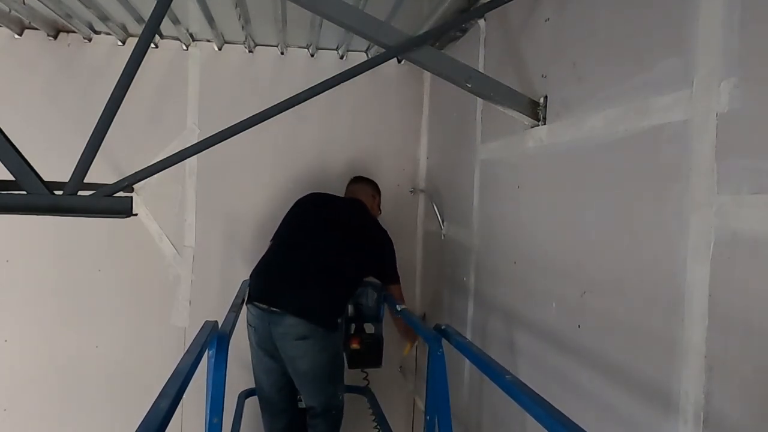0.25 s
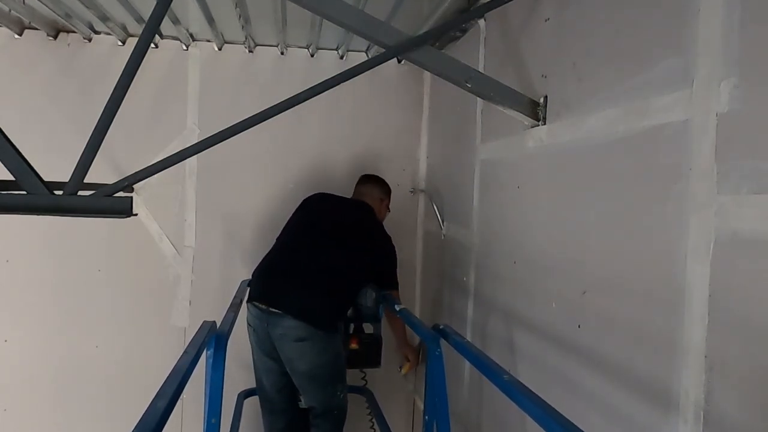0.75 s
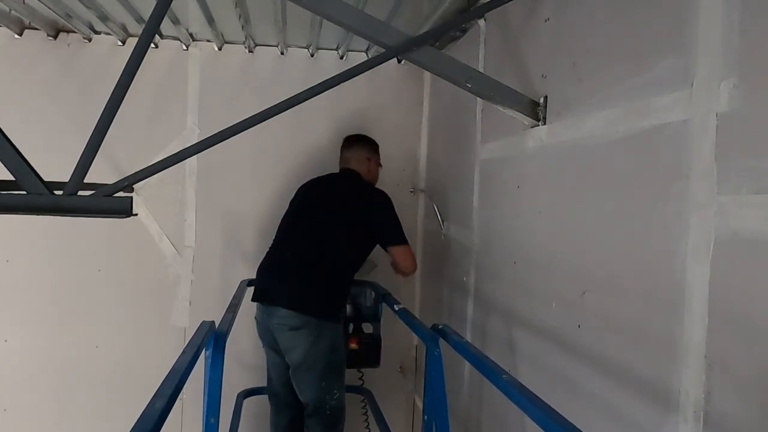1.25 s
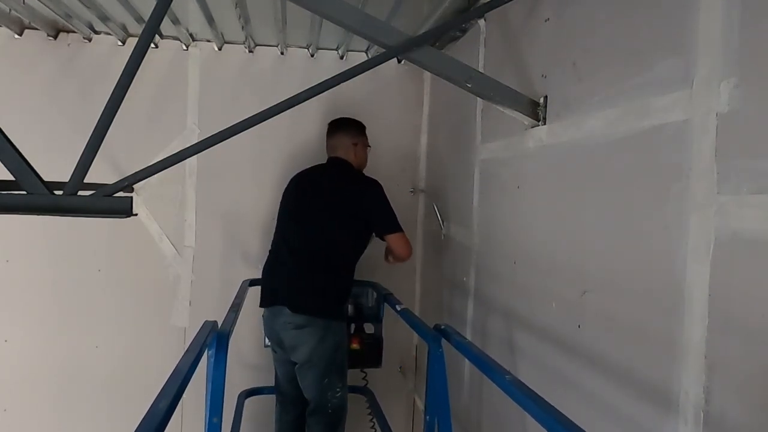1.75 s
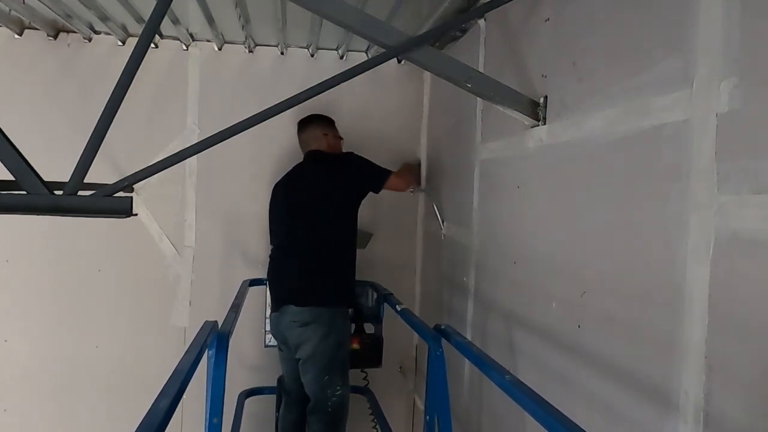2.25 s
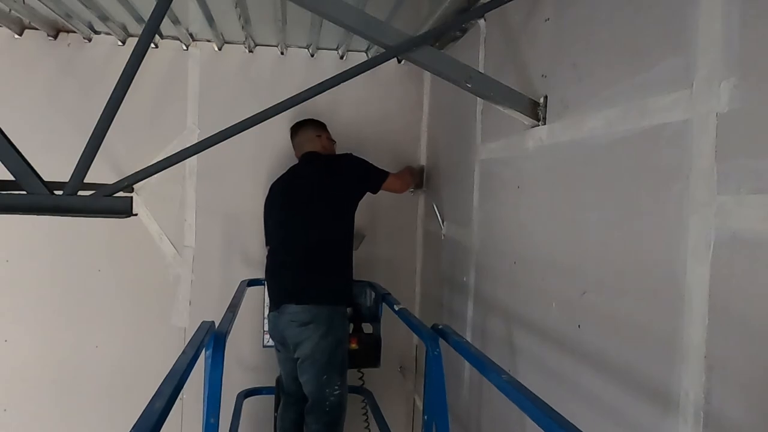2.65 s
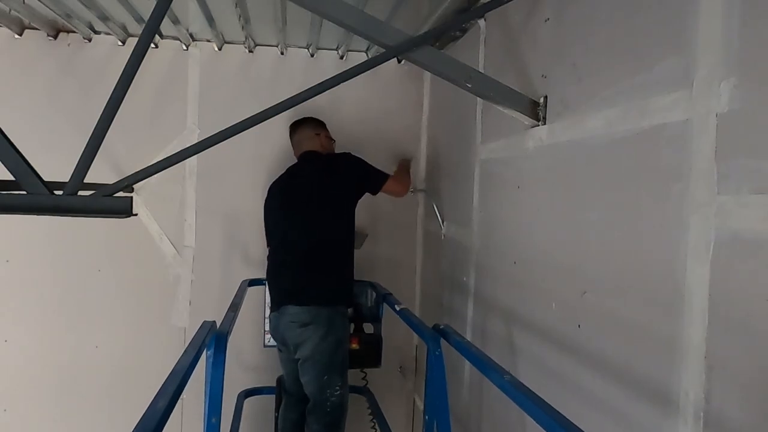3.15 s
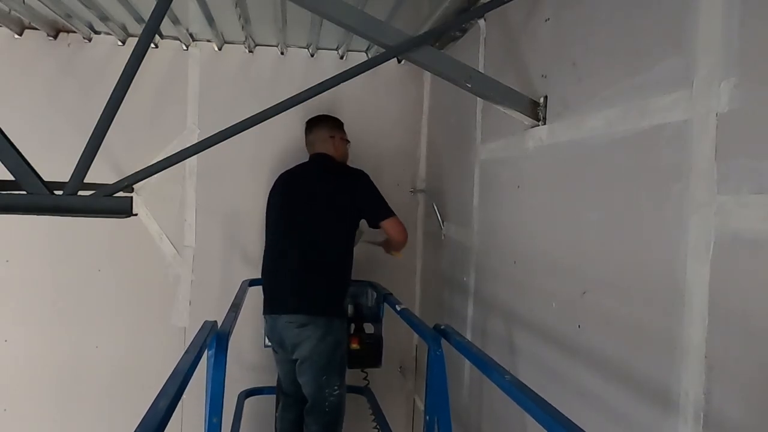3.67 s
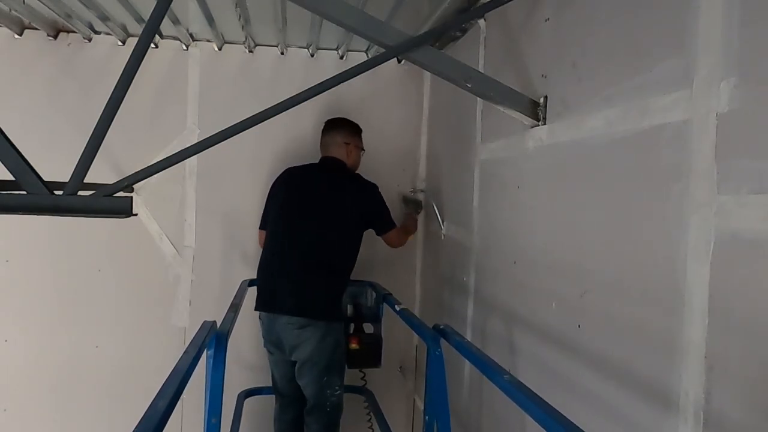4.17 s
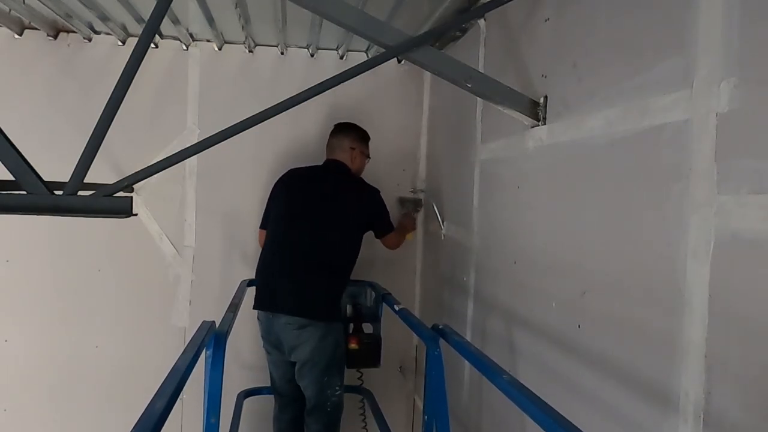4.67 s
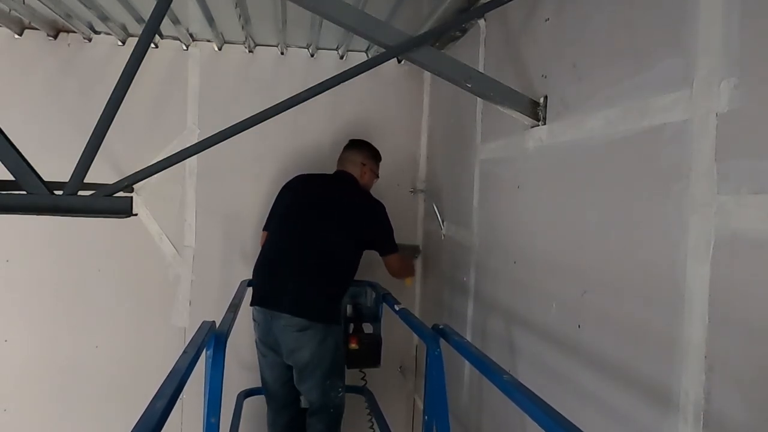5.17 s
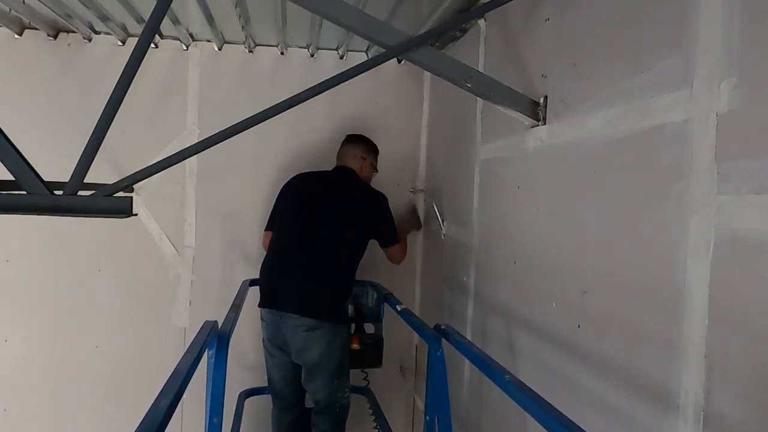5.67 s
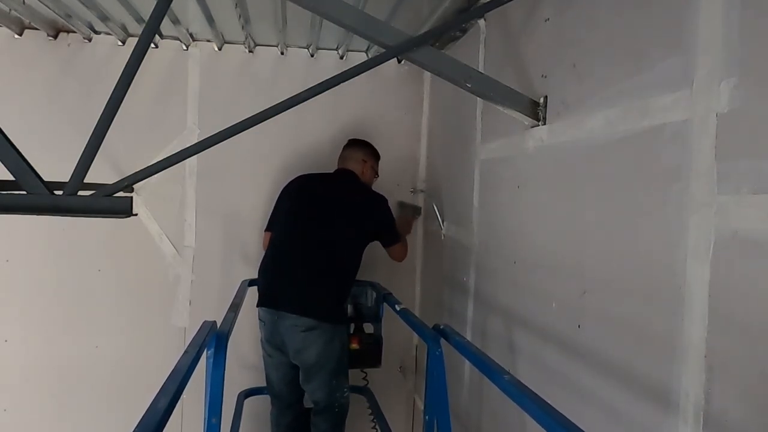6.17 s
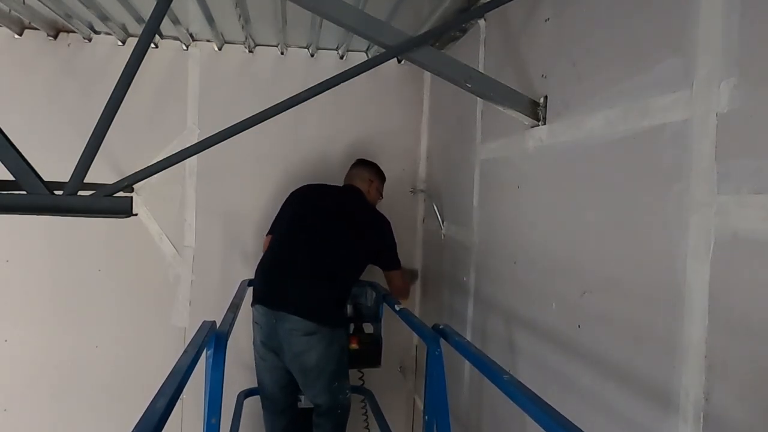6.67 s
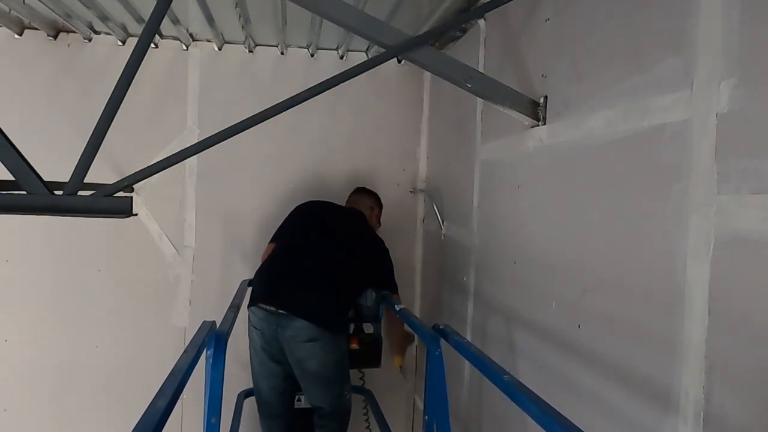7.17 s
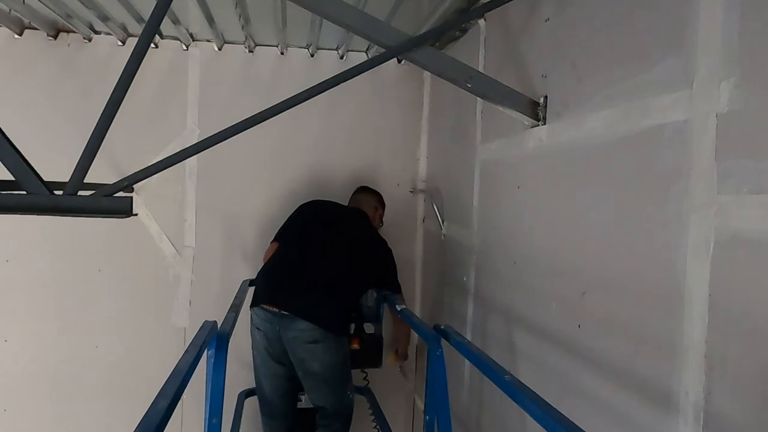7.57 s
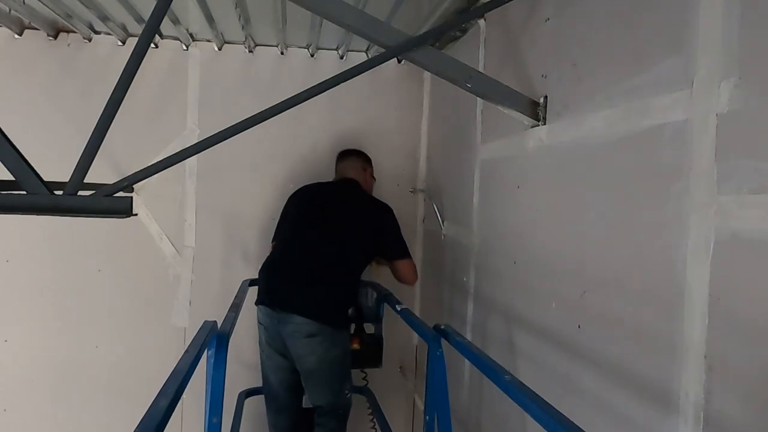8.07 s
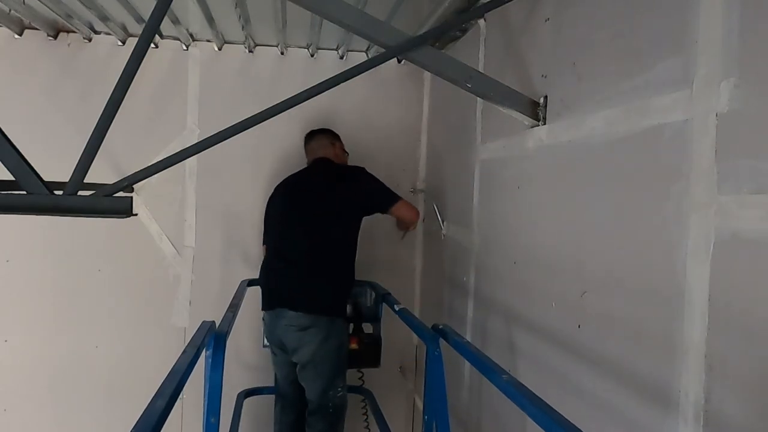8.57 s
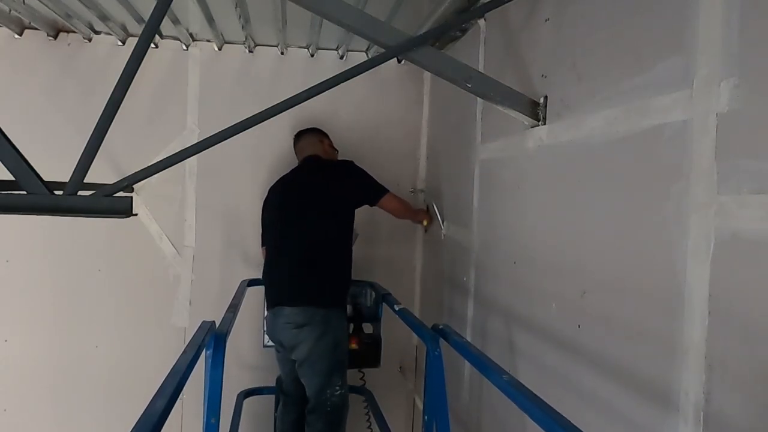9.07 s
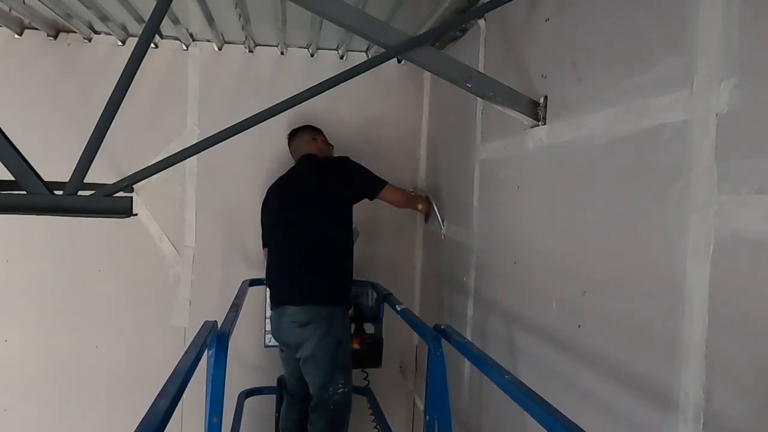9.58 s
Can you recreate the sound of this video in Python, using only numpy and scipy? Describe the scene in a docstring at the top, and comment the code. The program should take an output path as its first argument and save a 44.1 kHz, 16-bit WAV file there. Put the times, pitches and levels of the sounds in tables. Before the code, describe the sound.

A taping knife scrapes compound along drywall and clacks against a mud pan three times, in an echoing hall with traffic humming outside.

```python
"""A taping knife scrapes joint compound down a drywall corner in a tall steel-roofed hall, while
traffic hums outside. Grit under the edge hisses, rings the blade and drives the board; knocks thud
and tick on the wall. The first of four faint, high chirps hangs in the hall. Then the blade clacks on
the mud pan and is drawn clean over its rim, rubbing out a hollow note. Twice more the knife works the
wall and returns to the pan, and it ends with a few short scrapes."""
import sys
import numpy as np
from scipy import signal
from scipy.fft import rfft, irfft, next_fast_len
from scipy.io import wavfile
from scipy.ndimage import uniform_filter1d

SR = 44100
rng = np.random.default_rng(int(sys.argv[2]) if len(sys.argv) > 2 else 0)


def int16_out(signal):
    """Quantize to a 16-bit WAV file."""
    q = np.round(np.clip(np.atleast_2d(signal).T, -1, 1) * 32767)
    wavfile.write(sys.argv[1], SR, q.astype(np.int16))


N = 433498
TIME = np.arange(N) / SR


def amp(db):
    """Decibels to gain."""
    return 10 ** (np.asarray(db) / 20)


def unit_rms(x):
    """Scales to rms 1."""
    return x / np.sqrt(np.mean(x ** 2) + 1e-20)


def at_hz(points, hz):
    """Reads a table on a log-frequency axis."""
    points_hz, values = np.transpose(points)
    return np.interp(np.log(hz + 1), np.log(points_hz + 1), values)


def automation(rows, column=1):
    """One column of a table, joined by straight lines over time."""
    rows = np.array(rows)
    return np.interp(TIME, rows[:, 0], rows[:, column])


def add(mix, start_s, sound):
    """Lays a sound into the mix."""
    part = mix[max(round(start_s * SR), 0):][:len(sound)]
    part += sound[:len(part)]


def colour(x, spectrum):
    """Minimum-phase EQ of unit energy: the spectrum sets only the tone."""
    log_gain = np.log(amp(at_hz(spectrum, abs(np.fft.fftfreq(4096, 1 / SR)))))
    response = np.exp(np.conj(signal.hilbert(log_gain)))
    taps = np.fft.ifft(response).real[:2048]
    return signal.oaconvolve(x, taps / np.linalg.norm(taps))[:N]


def wander(per_s):
    """Random drift of rms 1."""
    knots = rng.standard_normal(4000)
    return unit_rms(np.interp(TIME * per_s, np.arange(len(knots)), knots))


def resonate(x, hz, *widths_hz):
    """Resonances in series, one per width, that follow the curve hz; rms 1."""
    carrier = np.exp(2j * np.pi * np.cumsum(hz) / SR)
    for width_hz in widths_hz:
        pole = np.exp(-np.pi * width_hz / SR)
        x = unit_rms((carrier * signal.lfilter([1 - pole], [1, -pole], x / carrier)).real)
    return x


def grit(per_s, spread_db, smear):
    """Friction: tiny slips of uneven size over a smooth smear."""
    slips = (rng.random(N) < per_s / SR) * rng.standard_normal(N)
    slips *= amp(spread_db * np.minimum(rng.exponential(1, N), 4))
    return unit_rms(unit_rms(slips) + smear * rng.standard_normal(N))


def pull(start_s, length_s, rise_s, release_s, change_db):
    """Envelope of one pull: the blade lands, its pressure drifts by change_db, and it lifts."""
    t, gain = np.arange(0, length_s, 1 / SR), np.zeros(N)
    lands = np.minimum(t / rise_s, 1) ** 0.9
    lifts = np.minimum((length_s - t) / release_s, 1) ** 1.5
    drift = amp(np.interp(t, [rise_s, length_s], [0, change_db]))
    add(gain, start_s, lands * lifts * drift)
    return gain


# Pulls along the wall; the sends feed the blade's ring and the board's drone:
# start_s, length_s, rise_s, release_s, level_db, change_db, ring_send_db, drone_send_db, board_pitch_hz
STROKES = [(0.0, 0.45, 0.0017, 0.078, -38.5, -3.5, 3.5, -9.5, 677),
           (0.44, 0.3, 0.022, 0.035, -42, -9, 0, -18, 820),
           (0.698, 0.081, 0.031, 0.015, -38.5, 2, -0.5, -2.5, 506),
           (0.795, 0.24, 0.037, 0.025, -41, -11, 3.5, -6, 490),
           (2.842, 0.43, 0.21, 0.07, -47.5, -3.5, 3.5, -13, 900),
           (4.757, 0.33, 0.17, 0.014, -39, -10, 12, 7, 830),
           (5.067, 0.32, 0.019, 0.14, -40, -6.5, 8, 5, 593),
           (6.229, 0.2, 0.11, 0.016, -36, -2.5, 9.5, 8, 764),
           (6.425, 0.21, 0.02, 0.0079, -40, 0.5, 6.5, 2, 763),
           (6.641, 0.515, 0.017, 0.038, -37.5, -3, 8, 5, 677),
           (7.109, 0.48, 0.048, 0.18, -37, -11, 6.5, 3.5, 593),
           (7.566, 0.21, 0.03, 0.044, -52, 1, 4.5, -4, 827),
           (9.072, 0.23, 0.19, 0.081, -43.5, -3.5, 0, -12, 780),
           (9.523, 0.11, 0.039, 0.02, -54, -9, 4, 0, 760),
           (9.625, 0.078, 0.046, 0.04, -35.5, 4, 7.5, -1, 840)]
# The hand's path and the blade's two notes: time_s, height_m, bend_hz, squeak_hz, squeal_amount
HAND = [(0, 1.04, 1310, 3830, 0.17), (.2, 0.81, 1133, 3650, 0.42), (.3, 1.05, 1500, 3930, 0.59),
        (.4, 1.07, 1093, 3440, 0.66), (.6, 0.63, 1157, 3930, 0.5), (.9, 0.46, 1006, 3440, 0.28),
        (3, 0.89, 1160, 3560, 0.52), (3.3, 2.7, 1110, 3550, 0.15), (4.9, 1.97, 1464, 3470, 0.36),
        (5.2, 1.01, 1470, 3870, 0.28), (6.3, 1.4, 1376, 3450, 0.17), (6.9, 0.86, 1205, 3920, .3),
        (7.25, 0.48, 1070, 3415, 0.068), (9.2, 1.6, 1310, 3500, 0.13), (9.8, 1.65, 1370, 3515, 0.16)]
# Tone of the hissing edge, the steel blade and the hollow board: frequency_hz, gain_db
EDGE_EQ = [(1500, -21), (2200, -5.5), (2750, -3.5), (3400, 0.5), (4200, -3), (5200, -6.5), (7000, -12.5),
           (8500, -16.5), (10800, -27), (12400, -27.5), (15500, -48)]
BLADE_EQ = [(600, -20.5), (850, -1.5), (1100, 6.5), (1500, 7), (2000, 3.5), (2400, -8.5), (3200, -38.5),
            (15500, -73.5)]
BOARD_EQ = [(100, -6.5), (220, -17), (350, -36), (470, -3.5), (600, -3), (730, 10), (900, 7), (1300, -31.5),
            (15500, -74.5)]


def scrapes():
    """Grit under the edge hisses, rings the blade and drives the board; the side wall echoes it."""
    hiss, ring, drone, board_hz = np.zeros((4, N))
    drag = amp(-0.5 * wander(per_s=16))  # the blade drags unevenly through the compound
    for start_s, length_s, rise_s, release_s, level_db, change_db, ring_db, drone_db, hz in STROKES:
        pressure = amp(level_db) * drag * pull(start_s, length_s, rise_s, release_s, change_db)
        hiss += pressure
        ring += amp(ring_db) * pressure
        drone += amp(drone_db) * pressure
        board_hz[TIME >= start_s] = hz
    ring, drone = uniform_filter1d([ring, drone], size=1500)  # both follow the pressure lazily
    slips = grit(per_s=1800, spread_db=2.2, smear=1.1) * amp(.9 * wander(per_s=70))
    # The blade's notes shift as it is pressed and tilted, and stand out when the edge runs dry.
    bend_hz = automation(HAND, column=2) * (1 + .03 * wander(per_s=14))
    squeak_hz = automation(HAND, column=3) * (1 + .015 * wander(per_s=20))
    squeal = automation(HAND, column=4)

    def voice(eq, note_gain, hz, widths_hz):
        """Equal-power blend of plain scrape and a singing note."""
        note = resonate(slips, hz, *widths_hz)
        return (colour(slips, eq) + note_gain * note) / np.hypot(1, note_gain)

    edge = voice(EDGE_EQ, squeal, squeak_hz, widths_hz=(220, 600))
    blade = voice(BLADE_EQ, 1.5 * squeal, bend_hz, widths_hz=(150, 400))
    board = voice(BOARD_EQ, 0.48, board_hz, widths_hz=(86, 172))
    scrape = amp(-0.5) * hiss * edge + amp(-4.5) * ring * blade + amp(-5) * drone * board
    echo_delay_s = np.hypot(automation(HAND), .4) / 343  # moves with the hand's height
    return 0.78 * (scrape + 0.22 * np.interp(TIME - echo_delay_s, TIME, scrape))


# An engine gathering speed, and a deeper one: time_s, pitch_hz, level_db
RISING_ENGINE = [(0, 92, -59), (.3, 92.5, -40), (.8, 93.5, -36), (1.2, 96.6, -47.5), (1.6, 103, -56),
                 (1.87, 106, -46), (2.03, 108, -50.5), (2.24, 109.6, -40.5), (2.52, 112, -64),
                 (3.28, 116, -46.5), (3.9, 117, -57.5), (4.44, 118.5, -45.5), (4.95, 121.5, -59.5),
                 (5.25, 123.6, -40), (5.5, 125, -57.5), (7.4, 129.8, -54), (9.83, 134, -53.5)]
DEEP_ENGINE = [(0, 66.7, -72), (.6, 66.9, -47), (1.5, 67.5, -72), (2.7, 68, -62.5), (3.3, 68.6, -50),
               (3.8, 69, -57), (4.7, 70.03, -49.5), (5.25, 71, -46), (5.9, 62.3, -47.5), (6.85, 65.2, -53),
               (7.28, 71.24, -35.5), (7.8, 76.1, -48.5), (8.2, 74, -34.5), (8.62, 68, -50.5),
               (9.2, 69.25, -40), (9.83, 71.97, -39.5)]
# Fader moves of the road noise: time_s, tyres_db, rumble_db
ROAD_LEVELS = [(0, -46.5, -46), (.7, -53.5, -47), (1.4, -57, -48.5), (2.8, -58.5, -48), (4.3, -57.5, -49),
               (5.8, -55, -49.5), (6.4, -51, -49), (7, -57, -47), (8, -50.5, -46), (8.7, -50, -48.5),
               (9.2, -45.5, -45.5), (9.83, -47, -45.5)]
# Tone of the tyres and the rumble: frequency_hz, gain_db
TYRE_EQ = [(250, -9), (450, -15.5), (700, -10.5), (1000, 0.5), (1350, 1.5), (1850, -5), (2400, -17),
           (3500, -22.5), (5500, -30), (8000, -35.5), (10000, -54), (15000, -73)]
RUMBLE_EQ = [(15, -31), (28, -11.5), (45, -1.5), (70, 1), (110, -2), (170, -6.5), (240, -10.5),
             (350, -19.5), (600, -27), (1500, -57), (4000, -73)]


def traffic():
    """Two engine notes, the roar of tyres and a rumble come through the walls."""
    hum = np.zeros(N)
    for engine, roughness, width_hz in [(RISING_ENGINE, .4, 12), (DEEP_ENGINE, .6, 9)]:
        pitch_hz, level_db = automation(engine), automation(engine, column=2)
        throb = resonate(rng.standard_normal(N), pitch_hz, width_hz, 3 * width_hz)
        phase = 2 * np.pi * np.cumsum(pitch_hz) / SR
        tone = np.sqrt(2) * np.sin(phase) + amp(-26.5) * np.sin(2 * phase)
        hum += amp(level_db) * unit_rms(tone + roughness * throb)
    tyres = amp(automation(ROAD_LEVELS) + .5 * wander(per_s=37))
    rumble = amp(automation(ROAD_LEVELS, column=2))
    road = [tyres * colour(tyre_noise, TYRE_EQ) + rumble * colour(low_noise, RUMBLE_EQ)
            for tyre_noise, low_noise in rng.standard_normal((2, 2, N))]
    return hum + diffuse(np.array(road))


def contact(decay_s, rise_s):
    """A blow of a springy blade: a burst of chatter that dies at once."""
    t = np.arange(SR // 8) / SR
    return rng.choice([-1., 1.], len(t)) * (1 - np.exp(-t / rise_s)) * np.exp(-t / decay_s)


def ringing(blows, modes):
    """Blows ring a bank of decaying modes of unit energy."""
    t = np.arange(SR // 2) / SR
    ring = sum(amp(db - 60 * t / t60_s) * np.sin(2 * np.pi * hz * t) for hz, db, t60_s in modes)
    return signal.oaconvolve(blows, ring / np.linalg.norm(ring))[:N]


# Blade hits on the wall: start_s, level_db, thud_send_db, tick_send_db, pitch_hz
KNOCKS = [(0.263, -39.5, -15, 6, 1570), (.724, -42.5, -10, 5.5, 1030), (.935, -43, 2.5, -10, 456),
          (1.068, -42.5, -6, -11, 504), (1.401, -62.5, -5, 3, 1190), (2.514, -65.5, -12, 7, 1200),
          (2.599, -48, -9, -9, 1340), (2.749, -68.5, -2, 5.5, 1200), (3.016, -44.5, 1.5, -10, 802),
          (3.423, -52, -12, -22, 1330), (4.282, -56.5, -5, -5, 1214), (4.627, -62.5, -18.5, 2, 1200),
          (4.951, -23, -20, -20, 883), (5.09, -22.5, -3, -20, 760), (5.768, -70, -13, 1, 1190),
          (6.158, -24, -9.5, -15.5, 1733), (6.184, -38.5, 13, -12, 1720), (6.207, -54, 18, -3, 330),
          (6.421, -22, -27, -15, 735), (7.597, -38.5, -9, -9, 1048), (7.619, -26, -21, -14.5, 1020),
          (7.715, -52, 11.5, -4, 1000), (8.982, -59.5, -14, 1, 1184), (9.113, -41, -15, -10, 1310),
          (9.497, -54, -2, 1, 1200)]
# The knife's own ring: pitch_hz, level_db, t60_s
KNIFE_MODES = [(860, -5.5, 0.14), (1070, -7.5, 0.053), (1426, 5.5, 0.047), (1380, 3.5, 0.022),
               (1940, -10, 0.034), (2890, -9, 0.041)]
# Tone of the board's thud: frequency_hz, gain_db
THUD_EQ = [(30, -11), (60, 2.5), (120, -4), (200, 4.5), (330, -5), (430, -6), (560, -10), (750, -17.5),
           (1200, -45), (15500, -84.5)]


def knocks():
    """The blade lands and rings, with a note set by the spot; the board thuds and the edge ticks."""
    blows, note, thud, tick = np.zeros((4, N))
    for start_s, level_db, thud_db, tick_db, pitch_hz in KNOCKS:
        blow = amp(level_db + 6) * contact(decay_s=.006, rise_s=.001)
        add(blows, start_s, blow)
        add(note, start_s, ringing(blow, [(pitch_hz, 0, 0.06)]))
        add(thud, start_s, amp(level_db + thud_db + 4) * contact(decay_s=.011, rise_s=.001))
        add(tick, start_s, amp(level_db + tick_db + 0.5) * contact(decay_s=.026, rise_s=.0014))
    steel = amp(-3.5) * colour(blows, BLADE_EQ) + amp(-7.5) * ringing(blows, KNIFE_MODES)
    return steel + amp(-5.5) * note + colour(thud, THUD_EQ) + colour(tick, EDGE_EQ)


# Faint high chirps: start_s, level_db, start_pitch_hz
CHIRPS = [(1.237, -66.5, 4440), (2.189, -61, 4190), (4.03, -62.5, 4200), (7.82, -63.5, 4510)]


def chirps():
    """Hoarse, far-off chirps: a falling tone roughened by noise."""
    track, progress = np.zeros(N), np.linspace(0, 1, SR // 5)
    lowpass = signal.butter(4, 600, fs=SR, output="sos")
    envelope = np.sin(np.pi * np.sqrt(progress))
    for start_s, level_db, start_hz in CHIRPS:
        pitch_hz = start_hz * (1 - .2 * progress)
        tone = np.sin(2 * np.pi * np.cumsum(pitch_hz) / SR)
        rasp = unit_rms(signal.sosfilt(lowpass, rng.standard_normal(len(progress))))
        add(track, start_s, amp(level_db + 3.5) * envelope * rasp * tone)
    return track


# Blade hits on the mud pan, in three clusters: start_s, level_db, decay_s
CLACKS = [(1.586, -22, 0.013), (1.598, -17, 0.013), (1.608, -28.5, 0.032), (3.581, -30.5, 0.023),
          (3.5915, -16, 0.0027), (3.595, -13, 0.0096), (8.331, -20.5, 0.0038), (8.335, -16.5, 0.013)]
# Tone of the impact: frequency_hz, gain_db
CLACK_EQ = [(60, -38.5), (120, -11.5), (330, -3.5), (430, -9), (780, -1), (980, -2.5), (1320, -2.5),
            (1520, -2.5), (1880, -0.5), (2350, -10.5), (3300, -8.5), (5500, -15), (8500, -24.5),
            (15500, -55)]
# The loaded pan's ring: pitch_hz, level_db, t60_s
PAN_MODES = [(272, -2, .1), (348, -16, 0.13), (553, -2.5, .2), (766.5, 5.5, 0.18), (1080, -18, 0.076),
             (1340, 5, 0.069), (1780, -6, .07), (1932, -3, 0.11), (2230, -6, .06), (2850, -16, .05),
             (3320, -18, .04), (4450, -18.5, .05)]


def pan_clacks():
    """The blade hits the pan, whose modes the compound damps quickly."""
    blows = np.zeros(N)
    for start_s, level_db, decay_s in CLACKS:
        add(blows, start_s, amp(level_db + 4.5) * contact(decay_s, rise_s=.0025))
    return colour(blows, CLACK_EQ) + amp(-13.5) * ringing(blows, PAN_MODES)


# The blade drawn over the rim: start_s, end_level_db
WIPES = [(1.632, -28), (3.618, -26.5), (8.362, -26.5)]
# Tone of steel sliding on the rim: frequency_hz, gain_db
WIPE_EQ = [(300, -19.5), (700, -31), (1300, 0), (2400, -1.5), (3400, 3), (5000, 1.5), (7000, -6),
           (8500, -9.5), (11000, -19), (15500, -28)]
# The pan's hollow note as the blade slides off: peak_s, level_db, pitch_hz, half_length_s
GROANS = [(1.789, -41.5, 560, .06), (3.78, -37, 542.3, 0.063), (8.516, -38, 548.8, 0.063)]


def rim_wipes():
    """Steel hisses over the rim, louder as it gathers speed, then rubs out the pan's hollow note."""
    rub = grit(per_s=3000, spread_db=1.2, smear=1.2)
    swell_db = 4
    speed = np.zeros(N)
    for start_s, end_db in WIPES:
        slide = pull(start_s, length_s=.1, rise_s=.051, release_s=.03, change_db=swell_db)
        speed += amp(end_db - swell_db) * slide
    track = speed * colour(rub, WIPE_EQ)
    dull_rub, groan_width_hz = colour(rub, BOARD_EQ), 27
    for peak_s, level_db, pitch_hz, half_length_s in GROANS:
        envelope = np.exp(-((TIME - peak_s) / half_length_s) ** 2)
        track += amp(level_db) * envelope * resonate(dull_rub, np.full(N, pitch_hz), groan_width_hz)
    return track


# Left-right likeness of diffuse sound: frequency_hz, coherence_ratio
COHERENCE = [(60, 0.89), (300, 0.88), (700, 0.84), (1400, 0.63), (3000, 0.18), (6500, 0), (15000, 0)]


def diffuse(pair):
    """Two unrelated signals become one field at two close microphones: narrow lows, wide highs."""
    size = next_fast_len(pair.shape[1], True)
    mid, side = rfft(pair, size)
    coherence = at_hz(COHERENCE, np.linspace(0, SR / 2, len(mid)))
    mid *= np.sqrt((1 + coherence) / 2)
    side *= np.sqrt((1 - coherence) / 2)
    return irfft(np.array([mid + side, mid - side]), size)[:, :pair.shape[1]]


def reflections(t60s, predelay_s, length_s):
    """Sparse echoes of random sign, each band dying at its own speed; unit energy per side."""
    size = int(length_s * SR)
    taps = rng.choice([-1., 1.], (2, size)) * (rng.random((2, size)) < .08)
    taps *= np.arange(size) / SR > predelay_s
    hz, age_s, bands = signal.stft(diffuse(taps), SR, nperseg=256)
    decay = amp(-60 * age_s / at_hz(t60s, hz)[:, None])
    tail = signal.istft(bands * decay, SR, nperseg=256)[1]
    return tail / np.sqrt(np.sum(tail ** 2) / 2)


def moving_reverb(send, fades_per_s, t60s, predelay_s, length_s):
    """A moving source crossfades round four patterns of echoes."""
    wet = np.zeros((2, N))
    for pattern in range(4):
        distance = abs((TIME * fades_per_s - pattern) % 4 - 2)
        fade = np.cos(np.pi / 2 * np.minimum(distance, 1))
        echoes = reflections(t60s, predelay_s, length_s)
        wet += signal.oaconvolve((send * fade)[None], echoes, axes=1)[:, :N]
    return wet


# The hall's reverb time: frequency_hz, t60_s
HALL_DECAY = [(100, 0.34), (300, 0.98), (700, 1.236), (1400, 1.06), (3000, 1.07), (5000, 1.02),
              (8000, 0.86), (14000, 0.45)]


def scene():
    """Direct sound from slightly right, quick echoes off the corner, the hall's tail, and traffic."""
    stems = np.array([scrapes(), knocks(), pan_clacks(), rim_wipes(), chirps()])
    direct = amp([-2, -2.5, 1, -0.5, -21]) @ stems
    early_send = amp([-5, -9, -9.5, -5.5, 3.5]) @ stems
    hall_send = amp([-13.5, -9, -5.5, -11.5, -0.5]) @ stems
    early_decay = [(100, 0.21), (15000, 0.17)]  # frequency_hz, t60_s
    early = moving_reverb(early_send, fades_per_s=7, t60s=early_decay, predelay_s=.001, length_s=.125)
    tail = moving_reverb(hall_send, fades_per_s=5, t60s=HALL_DECAY, predelay_s=.022, length_s=1.5)
    return np.array([np.roll(direct, 1), direct]) + early + tail + traffic()


# Balance of the microphone pair: frequency_hz, left_minus_right_db
MIC_BALANCE = [(100, 0.6), (500, 0.1), (1200, 2), (2500, 3), (4500, 1), (8000, 1), (13000, -6)]


def record(dry):
    """Each microphone has its own slight colour; a steep low-pass trims the top."""
    size = next_fast_len(N, True)
    balance_db = at_hz(MIC_BALANCE, np.fft.rfftfreq(size, 1 / SR))
    gains = amp(np.array([balance_db, -balance_db]) / 2)
    pair = irfft(rfft(dry, size) * gains, size)[:, :N]
    lowpass = signal.firwin(511, cutoff=15650, window=("kaiser", 9), fs=SR)
    return signal.oaconvolve(pair, lowpass[None], "same")


dry = scene()
out = record(dry)
int16_out(out)
```